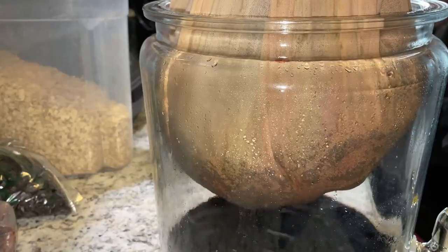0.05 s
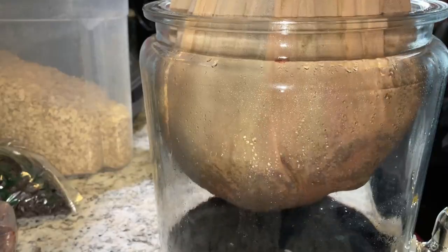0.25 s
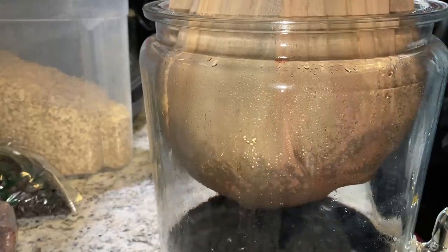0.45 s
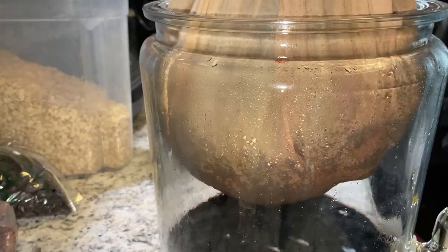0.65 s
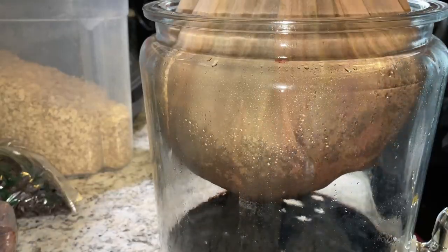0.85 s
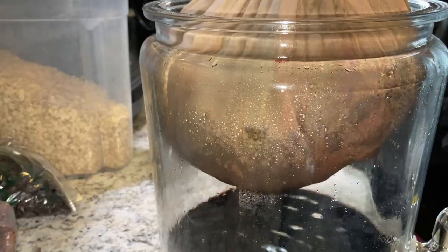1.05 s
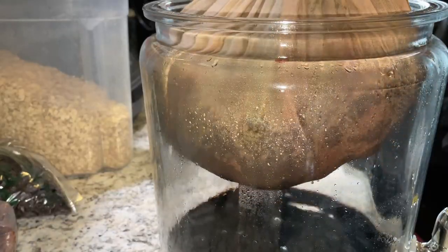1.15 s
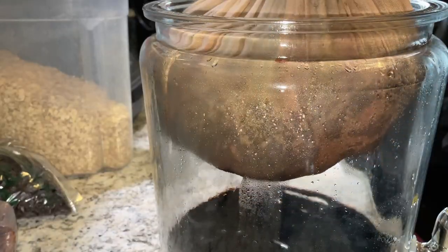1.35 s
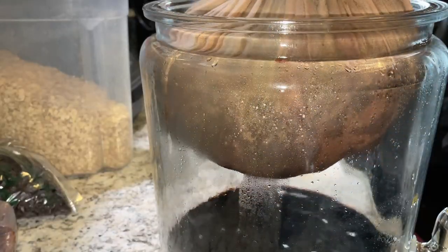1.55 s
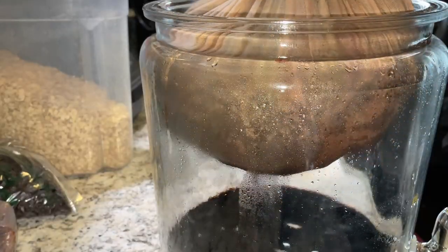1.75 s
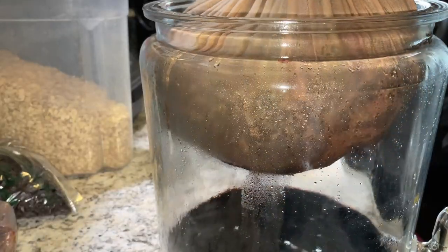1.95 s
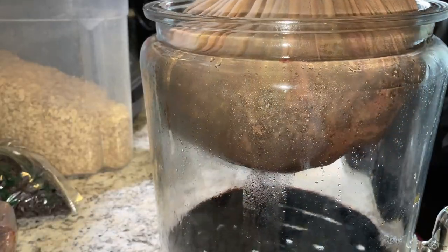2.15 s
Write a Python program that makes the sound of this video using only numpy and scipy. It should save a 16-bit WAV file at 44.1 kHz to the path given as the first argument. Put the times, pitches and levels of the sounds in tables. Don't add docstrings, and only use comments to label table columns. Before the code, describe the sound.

Liquid drips from a wet cloth bag into a glass jar, with one sharp early knock

```python
import sys
import numpy as np
from scipy import signal
from scipy.io import wavfile

SR = 44100
rng = np.random.default_rng(int(sys.argv[2]) if len(sys.argv) > 2 else 0)


def digitize_waveform(pressure):
    field = np.atleast_2d(pressure).T
    bounded = np.clip(field, -1, 1)
    quanta = np.round(bounded * 32767).astype(np.int16)
    wavfile.write(sys.argv[1], SR, quanta)


def volts_from_db(level):
    exponent = np.asarray(level, float) / 20
    return 10 ** exponent


N = 94815

# (time [s], peak level [dB], pitch [Hz], length [s])
DROP_BUBBLES = [(0.114, -58.5, 1664, 0.013), (.122, -53.5, 1896, 0.011), (.123, -72, 3250, 0.014),
                (0.649, -54, 1900, 0.0095), (0.665, -51.5, 1887, 0.019), (.785, -42, 1964, 0.012),
                (0.887, -58, 1875, 0.012), (0.929, -57.5, 1867, 0.026), (1.024, -55, 2483, 0.016),
                (1.026, -60.5, 1876, 0.018), (1.08, -57, 1852, 0.019), (1.125, -69.5, 2490, 0.03),
                (1.155, -68, 1933, .012), (1.23, -66, 1815, 0.014), (1.274, -59.5, 1865, 0.017),
                (1.312, -49.5, 1806, 0.016), (1.338, -56, 2447, 0.017), (1.341, -42.5, 1780, 0.0042),
                (1.365, -61, 1818, 0.023), (1.596, -60.5, 2026, 0.019), (1.611, -60, 1820, 0.032),
                (1.676, -51.5, 1950, 0.0037), (1.81, -46, 3020, 0.0026), (1.834, -44, 1840, 0.015),
                (1.893, -60, 1700, 0.0073), (1.915, -47.5, 1770, 0.0075), (1.943, -43.5, 1866, 0.0083),
                (1.992, -60, 1940, 0.013), (2.009, -54, 3520, 0.0082), (2.065, -67, 1794, 0.026),
                (0.317, -42.5, 554, 0.04), (0.49, -48.5, 1320, 0.012), (0.933, -59.5, 1530, .03),
                (1.05, -70, 1450, 0.036), (1.197, -58.5, 1122, 0.034), (1.21, -62.5, 1320, 0.013),
                (1.327, -58.5, 1490, 0.022), (1.361, -52.5, 1280, 0.011), (1.56, -55, 1097, 0.011),
                (1.605, -62, 1380, 0.024), (1.659, -58, 1356, 0.013), (1.686, -52, 1100, 0.015),
                (1.759, -58.5, 1320, 0.024), (1.781, -58.5, 900, 0.016), (1.836, -46, 1320, 0.014),
                (1.937, -57.5, 894, 0.02), (1.966, -60.5, 1320, 0.031), (2.015, -35, 1046, 0.0038),
                (2.025, -47.5, 1320, 0.0066), (2.036, -52.5, 894, 0.015),
                (0.525, -66, 1720, .012), (0.571, -70, 1720, 0.0091), (0.583, -70, 1670, 0.013),
                   (0.647, -61.5, 2490, 0.022), (0.688, -54.5, 2080, .012), (.785, -55, 2536, 0.0099),
                   (0.786, -63, 1130, 0.0072), (0.883, -65, 2490, 0.016), (0.888, -61, 1570, 0.0089),
                   (0.937, -77, 2490, 0.012), (1.661, -60.5, 1690, 0.0087), (1.715, -62, 945, 0.0071),
                   (1.772, -63.5, 2476, 0.022), (1.811, -53.5, 980, 0.0057), (1.852, -61, 1870, 0.0067),
                   (1.915, -60, 1430, 0.014), (1.973, -58, 1730, .014), (2.035, -60, 1740, 0.0082)]
# (frequency [Hz], level [dB], t60 [s])
JAR_AIR_MODES = [(894, -8.5, 0.024), (1100, -20, 0.11), (1320, -21, 0.24), (1574, -12, 0.074),
                 (1840, -11, 0.12), (1880, -16, 0.073), (2560, -16, 0.088), (3250, -9.5, 0.011)]
# (time [s], peak level [dB], contact cut-off [Hz], share into the glass [dB], weight on low modes [dB])
JAR_TOUCHES = [(.2385, -22, 890, -6, 6), (0.2420, -22, 2030, 2.5, 3.5), (0.2445, -29, 1520, 11, 0.5),
               (.254, -19, 2080, -5, -3), (0.265, -12, 3000, -12, -4.5), (0.271, -27.5, 990, 8.5, 1.5),
               (.2790, -27.5, 1000, 8, 0), (0.2876, -20, 1990, -9, 0), (.299, -39, 1197, 4, 3),
               (0.307, -54, 900, 13, 3.5), (0.317, -40.5, 774, 6, -11)]
# (frequency [Hz], level [dB], t60 [s])
GLASS_MODES = [(1130, -6.5, 0.2), (2825, -12, 0.2), (2890, -19, .1), (4990, -24, 0.25), (5060, -33, .12),
               (6002, -40, 0.089), (7375, -35, 0.2), (9880, -39, 0.2), (10020, -45, .1), (12300, -46, .15)]
# (frequency [Hz], level [dB], t60 [s])
COUNTER_MODES = [(152.1, -16.5, 0.31), (197.1, -8, 0.22), (255.7, -12, 0.16), (391.1, -7, 0.16),
                 (441.4, -10, 0.17), (526.6, -10.5, 0.08), (590.7, -9.5, 0.09), (737.7, -8, 0.057),
                 (933, -14.5, 0.058), (1407, -7.5, 0.018), (1588, -8, 0.031), (1770, -4, 0.017),
                 (3218, -18, 0.029)]
# (frequency [Hz], density [dB per Hz])
ECHO_SPECTRUM = [(35, -8.5), (60, 2.5), (173, 7), (472, -9), (550, -7), (749, -4.5), (1040, -10),
                 (2200, -21), (7800, -54.5), (13200, -120)]
# (time [s], level [dB])
CLOTH_STRAIN = [(0, -100), (.34, -87), (.355, -68), (.53, -73.5), (.545, -64.5), (.88, -62.5), (.9, -73),
                (1.36, -75), (1.39, -84.5), (1.49, -84), (1.51, -73.5), (1.72, -71.5), (1.76, -64.5),
                (1.9, -63), (2.07, -68), (2.09, -74), (2.15, -77.5)]
# (time [s], length [s], level [dB], centre [Hz])
CLOTH_RUBS = [(0.37, 0.017, -77, 4000), (0.412, 0.027, -62, 4530), (0.544, 0.014, -67.5, 10700),
              (0.611, 0.039, -59.5, 8330), (0.679, 0.02, -53, 6000), (0.735, 0.023, -61.5, 5100),
              (0.821, 0.074, -71.5, 9050), (1.014, 0.022, -71, 6240), (1.1228, 0.00073, -53, 7900),
              (1.211, 0.024, -73.5, 5170), (1.31, 0.011, -66.5, 4980), (1.503, 0.0045, -73, 6450),
              (1.595, 0.014, -64.5, 7300), (1.728, 0.046, -83, 4860), (1.81, 0.0069, -69, 3500),
              (1.913, 0.042, -59.5, 8500), (1.94, 0.0083, -60.5, 8800), (2.007, 0.0077, -71, 3930),
              (2.126, 0.028, -70.5, 3600)]
# (frequency [Hz], density [dB per Hz])
RUSTLE_SPECTRUM = [(880, 2), (1500, -14), (1750, -4), (2780, -0.5), (3410, -9.5), (4230, 3), (4850, -3.5),
                   (9910, -0.5), (15600, -5)]
# (time [s], level [dB], pitch [Hz], t60 [s])
FIBRE_TICKS = [(0.1006, -75.5, 8900, 0.032), (.378, -59, 6660, 0.04), (0.484, -56.5, 3250, 0.023),
               (.5437, -51.5, 8540, .02), (1.2723, -64, 7000, .025), (1.345, -66, 7850, .02),
               (1.6018, -48, 9250, 0.042), (1.599, -58, 5250, 0.069), (1.602, -56, 5950, 0.049),
               (1.6457, -57, 11200, .015), (1.6734, -57.5, 8140, 0.018), (1.7324, -51, 5060, 0.032),
               (1.8612, -52, 11400, .015), (2.126, -58, 3630, 0.035), (1.31, -61.5, 6100, .02),
               (1.9121, -52, 7000, 0.013), (2.0694, -57.5, 4730, 0.027)]
# (frequency [Hz], density [dB per Hz])
HUM_SPECTRUM = [(20, -16), (64, -1.5), (120, -3), (310, -15.5), (395, -14), (500, -24), (1500, -38),
                (6000, -56.5)]

BUBBLE_ATTACK_S, BUBBLE_FADE_DB, BUBBLE_RISE, WOBBLE_DB = 0.0022, 8, 0.015, 3.5
TWIN_DB, TWIN_SPREAD = -8.5, 0.0628
SPLASH_DB = -33
TRICKLE_DB, TRICKLE_FROM_S, TRICKLE_FLICKER_DB = -69, 0.32, 2.5
STILLED_S, STILLING_S, STILLED_DB, GLASS_STILLED_DB = 0.292, 0.01, -10.5, -20.5
KNOCK_DB, CONTACT_S, CRACK_DB, CRACK_T60_S = 0, 0.002, -12, 0.008
LOW_MODES_HZ, THUD_CUT_HZ = 480, 80
TOUCH_DAMPS_DB, DAMPING_S = -6, 0.002
GLASS_FLUTTER_DB, GLASS_SWELL_S, LATE_GLASS_CUT_HZ = 3, 0.0012, 3200
GRIT_DB, GRIT_HZ, GRIT_TOP_HZ, GRIT_FLICKER_DB = -45.5, 3000, 7000, 3.5
ECHO_DB, ECHO_LOW_T60_S, ECHO_HIGH_T60_S = -35, 0.56, 0.28
RUB_OCTAVES, RUB_EDGE_S = 0.95, 0.0013
GRAIN_DB, PATCH_DB = 2.2, 1.8
TICK_WIDTH = 0.036
HUM_DB = -56.5
TOP_HZ = 16300

TIME = np.arange(N) / SR


def rms_one(x):
    return x / np.sqrt(np.mean(x ** 2) + 1e-20)


def drift(rate):
    r = np.exp(-2 * np.pi * rate / SR)
    return rms_one(signal.lfilter([1], [1, -2 * r, r * r], rng.standard_normal(N + SR))[SR:])


def ring(x, hz, t60):
    r = volts_from_db(-60 / (t60 * SR))
    w = 2 * np.pi * hz / SR
    return signal.lfilter([0, np.sin(w)], [1, -2 * r * np.cos(w), r * r], x + 1e-18)


def filtered(x, order, hz, kind="low"):
    return signal.lfilter(*signal.butter(order, hz, kind, fs=SR), x)


def banded(spectrum, shape):
    hz_points, db_points = np.transpose(spectrum)
    white = rng.standard_normal((2, N + SR))
    edges = 22 * 2 ** np.arange(0, 9.9, 1 / 3)
    out, power = 0, 0
    for k, (low, high) in enumerate(zip(edges, edges[1:])):
        hz = np.sqrt(low * high)
        gain = volts_from_db(np.interp(np.log(hz), np.log(hz_points), db_points, left=-90, right=-90))
        bandpass = signal.butter(2, [low, high], "band", fs=SR, output="sos")
        band = gain * signal.sosfilt(bandpass, white[k % 2])[SR:]
        out = out + band * shape(hz)
        power = power + np.mean(band ** 2)
    return out / np.sqrt(power)


def drips():
    bubbles, splash, noise = np.zeros(N), np.zeros(N), rng.standard_normal(N)
    events = DROP_BUBBLES
    chance = rng.uniform(-1, 1, (len(events), 2))
    for (s, db, hz, length), (detune, turn) in zip(events, chance):
        i = int(s * SR)
        t = np.arange(int(1.5 * length * SR)) / SR
        attack = 1 - np.exp(-t / BUBBLE_ATTACK_S)
        shape = attack * volts_from_db(-BUBBLE_FADE_DB * t / length) * np.abs(1 - (t / t[-1]) ** 4)
        phase = 2 * np.pi * hz * t * (1 + BUBBLE_RISE * (t / length - 1) / 2)
        twin_ratio = 1 + TWIN_SPREAD * (np.sign(detune) + detune / 2)
        twin = volts_from_db(TWIN_DB) * np.sin(phase * twin_ratio + np.pi * turn)
        bubbles[i:i + len(t)] += volts_from_db(db + 1.5) * shape * (np.sin(phase) + twin)
        splash[i:i + len(t)] += volts_from_db(db + SPLASH_DB) * np.exp(-t / 0.009) * noise[i:i + len(t)]
    bubbles = bubbles * volts_from_db(WOBBLE_DB * drift(119))

    flow_db = 0.8 * (np.interp(TIME, *np.transpose(CLOTH_STRAIN)) + 70)
    out = bubbles.copy()
    for k, (hz, db, t60) in enumerate(JAR_AIR_MODES):
        decay_per_sample = np.log(1000) / (t60 * SR)
        flow = (TIME > TRICKLE_FROM_S) * volts_from_db(TRICKLE_DB + flow_db + TRICKLE_FLICKER_DB * drift(25))
        trickle = flow * rng.standard_normal(N) * np.sqrt(decay_per_sample)
        drive = 4.1 * decay_per_sample * bubbles + splash + trickle
        out += (-1) ** k * volts_from_db(db) * ring(drive, hz, t60)
    return out


def jar_contacts(still, noise):
    out, span = np.zeros(N), SR // 2
    age = TIME[:span]
    chance = rng.standard_normal((len(JAR_TOUCHES), len(COUNTER_MODES + GLASS_MODES)))
    flutter = volts_from_db(GLASS_FLUTTER_DB * drift(170))
    for (s, db, cut_hz, glass_db, weight_db), row in zip(JAR_TOUCHES, chance):
        i = int(s * SR)
        now = slice(i, i + span)
        scuff = 0.06 * noise[now] * np.exp(-age / CONTACT_S)
        scuff[0] += 1

        wood = volts_from_db(CRACK_DB - 60 * age / CRACK_T60_S) * noise[now]
        for k, ((hz, mode_db, t60), c) in enumerate(zip(COUNTER_MODES, row)):
            level = volts_from_db(mode_db + 2 * c + weight_db * (hz < LOW_MODES_HZ))
            wood = wood + level * (-1) ** k * ring(scuff, hz, t60)
        wood = filtered(wood, 2, cut_hz)
        if s <= STILLED_S + STILLING_S:
            wood = wood * volts_from_db(STILLED_DB * still[now])

        glass = sum(volts_from_db(d + c) * ring(scuff, hz, t60) for (hz, d, t60), c in zip(GLASS_MODES, row[::-1]))
        later_touches = [later for later, *_ in JAR_TOUCHES if later > s + 0.004]
        checked = sum(np.clip((age + s - later) / DAMPING_S, 0, 1) for later in later_touches)
        swell = (1 - np.exp(-age / GLASS_SWELL_S)) ** 2
        glass = glass * volts_from_db(TOUCH_DAMPS_DB * checked) * flutter[now] * swell
        if s > STILLED_S:
            glass = filtered(glass, 2, LATE_GLASS_CUT_HZ)
        glass = glass * volts_from_db(glass_db - 8 + GLASS_STILLED_DB * still[now] * (s < STILLED_S))
        out[now] += volts_from_db(db + KNOCK_DB) * (wood + glass)
    return filtered(out, 2, THUD_CUT_HZ, "high")


def grit(age, still, noise):
    fade_db = -76 * age - 270 * np.maximum(TIME - STILLED_S, 0)
    level = volts_from_db(GRIT_DB + fade_db + GRIT_FLICKER_DB * drift(110))
    hiss = filtered(noise[::-1], 1, GRIT_HZ, "high")
    hiss = hiss * (1 - np.exp(-age / 0.0014)) * (1 - 1.1 * still) * level
    return filtered(hiss, 2, GRIT_TOP_HZ) / 2


def kitchen_echo(age):
    swell = 1 - np.exp(-age / 0.005)

    def decay(hz):
        t60 = np.interp(np.log(hz), np.log([100, 2000]), [ECHO_LOW_T60_S, ECHO_HIGH_T60_S])
        return swell * volts_from_db(-60 * np.maximum(age - 0.06, 0) / t60)

    return volts_from_db(ECHO_DB) * banded(ECHO_SPECTRUM, decay)


def knock():
    still = np.clip((TIME - STILLED_S) / STILLING_S, 0, 1)
    age = np.maximum(TIME - JAR_TOUCHES[0][0], 0)
    noise = rng.standard_normal(N)
    return jar_contacts(still, noise) + grit(age, still, noise) + kitchen_echo(age)


def cloth():
    strain = volts_from_db(np.interp(TIME, *np.transpose(CLOTH_STRAIN)))
    grain_db = GRAIN_DB * drift(300)
    s, length, db, centre_hz = np.transpose(CLOTH_RUBS)[:, :, None]
    rise = (TIME - s) / RUB_EDGE_S
    fall = (s + length - TIME) / (5.6 * RUB_EDGE_S) + 1
    rubs = volts_from_db(db) * np.clip(np.minimum(rise, fall), 0, 1)

    def friction(hz):
        nearness = np.exp(-(np.log2(hz / centre_hz[:, 0]) / RUB_OCTAVES) ** 2)
        return (strain + nearness @ rubs) * volts_from_db(grain_db + PATCH_DB * drift(27))

    return banded(RUSTLE_SPECTRUM, friction)


def ticks():
    out, noise = np.zeros(N + SR), rng.standard_normal(N + SR)
    age = np.arange(SR // 10) / SR
    for s, db, hz, t60 in FIBRE_TICKS:
        i = int(s * SR)
        fizz = rms_one(ring(noise[i:i + len(age)], hz, 2.2 / (TICK_WIDTH * hz)))
        out[i:i + len(age)] += volts_from_db(db - 60 * age / t60) * (1 - np.exp(-age / 0.0017)) * fizz
    return out[:N]


def room_tone():
    return volts_from_db(HUM_DB) * banded(HUM_SPECTRUM, lambda hz: volts_from_db(1.2 * drift(6)))


def scene():
    return (drips() + knock() + cloth() + ticks() + room_tone())[None]


def top_cut(x):
    return signal.sosfilt(signal.butter(12, 15700, fs=SR, output="sos"), x)


def record(dry):
    lowpass = signal.cheby2(10, 40, TOP_HZ, fs=SR, output="sos")
    mix = signal.sosfilt(lowpass, dry)
    return top_cut(mix)


dry = scene()
out = record(dry)
digitize_waveform(out)
```